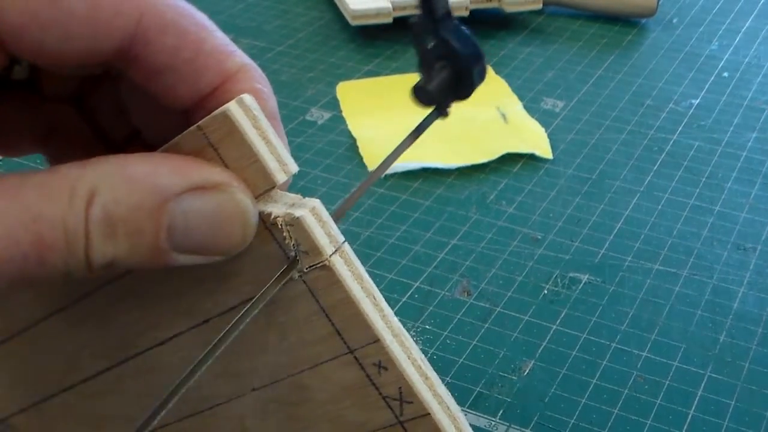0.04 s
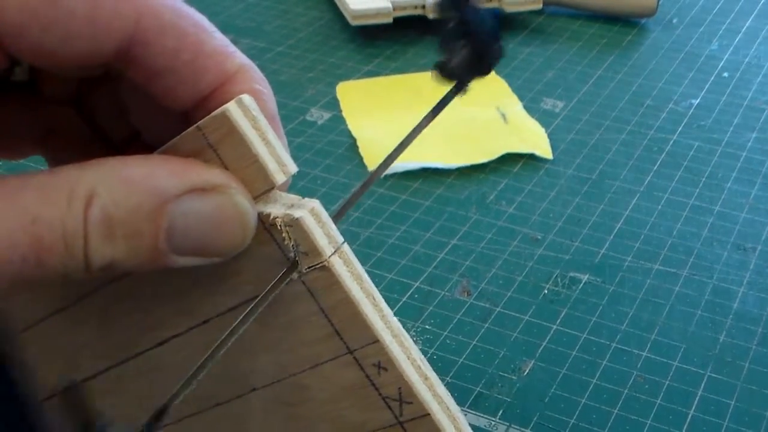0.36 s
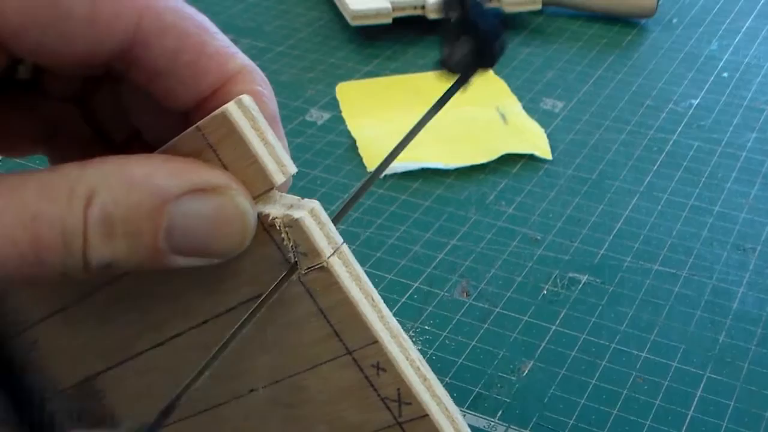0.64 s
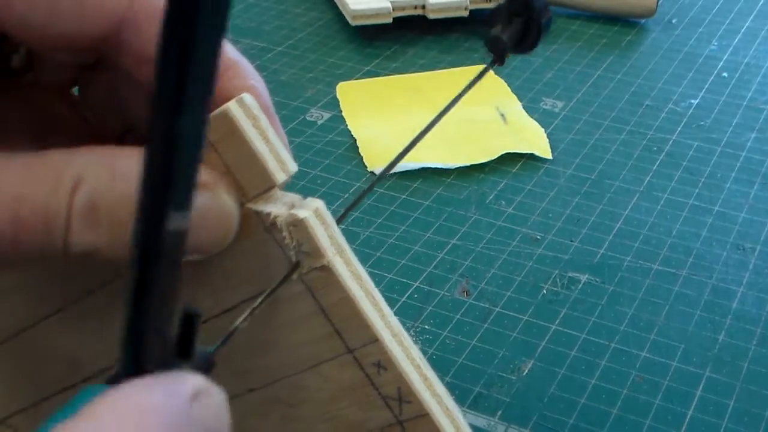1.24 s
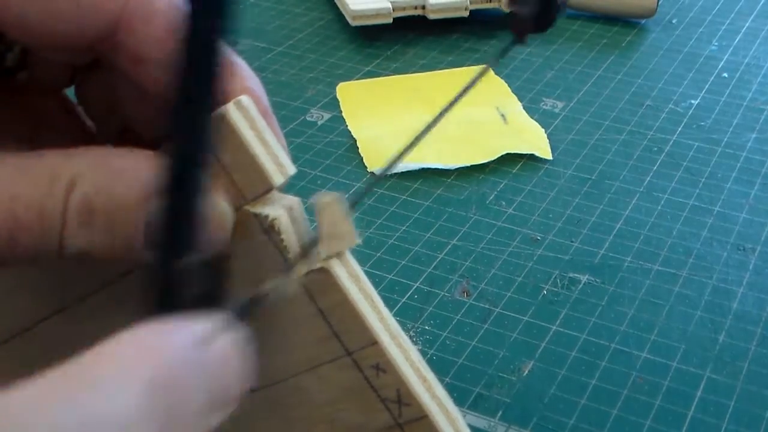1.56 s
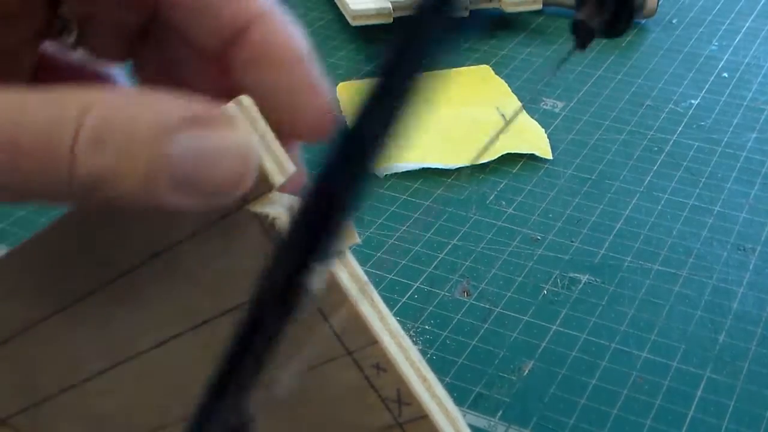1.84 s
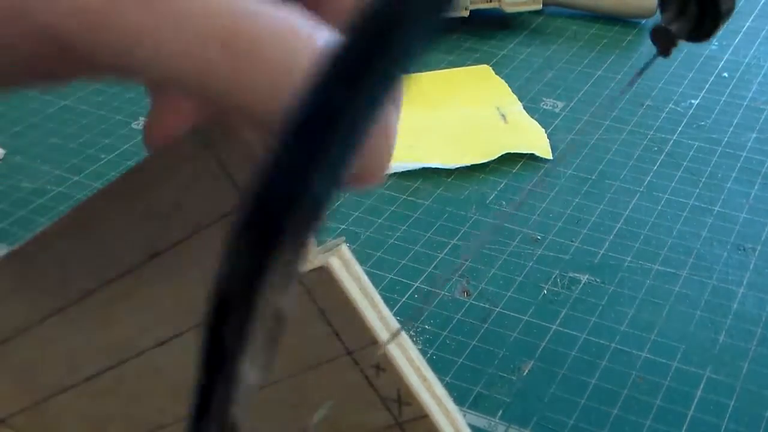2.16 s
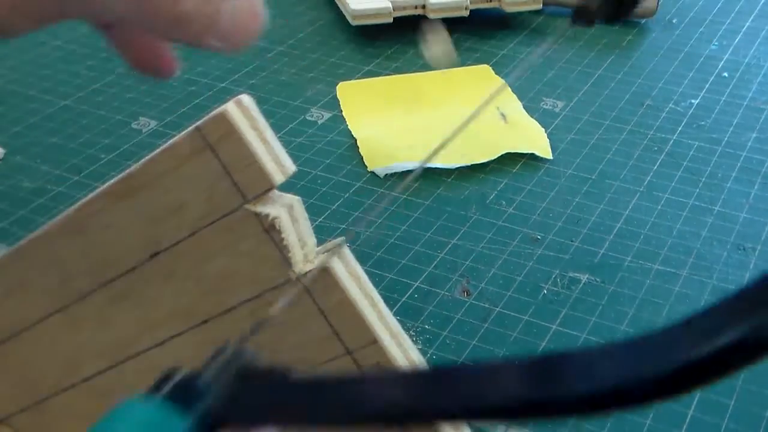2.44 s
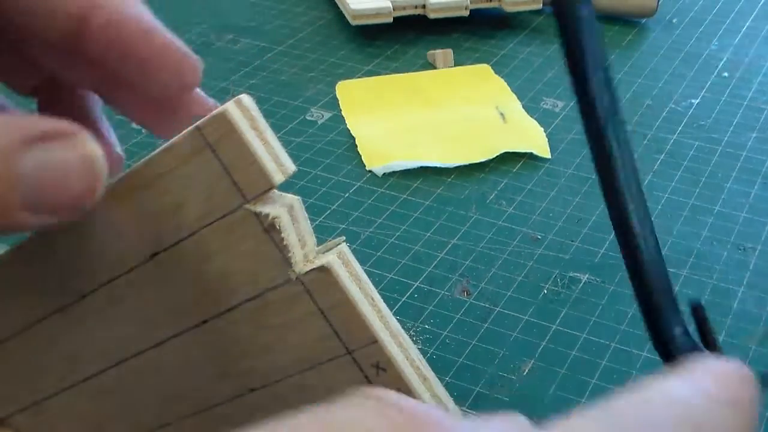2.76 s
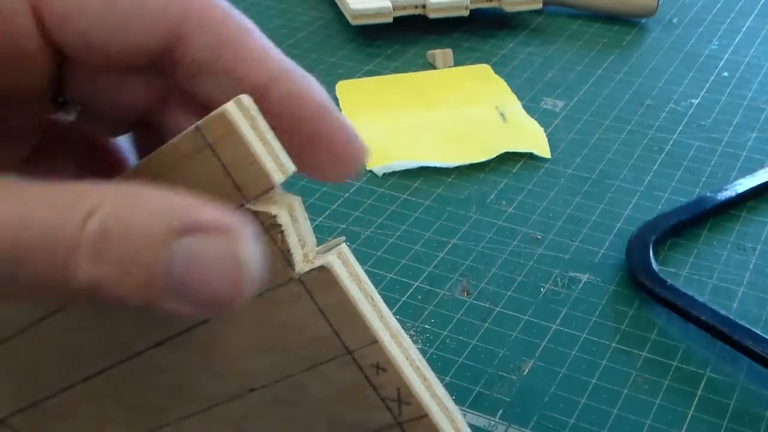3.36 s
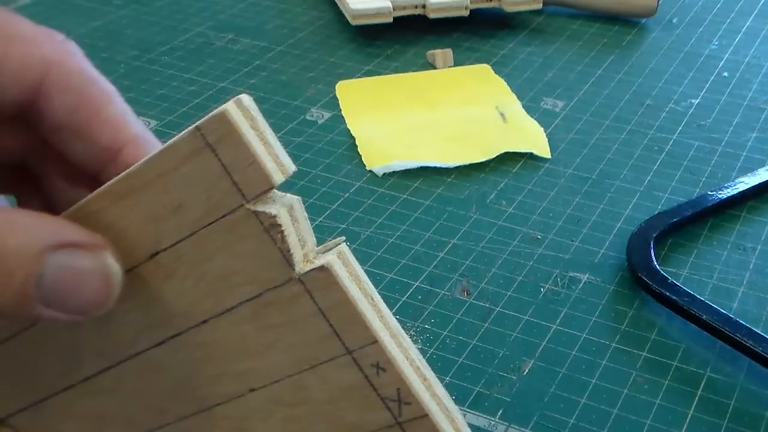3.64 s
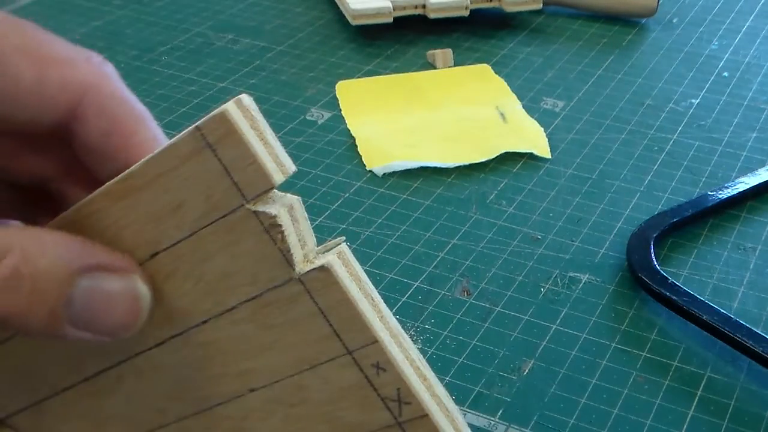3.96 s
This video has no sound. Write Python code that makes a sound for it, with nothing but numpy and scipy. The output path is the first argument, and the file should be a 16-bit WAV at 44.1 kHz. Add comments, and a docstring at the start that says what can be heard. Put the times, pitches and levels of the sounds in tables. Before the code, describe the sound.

A hand saw rasps quickly through plywood, followed by light clicks and wooden knocks.

```python
"""A coping saw cuts a notch in plywood held over a bench, heard close by in a small workshop.
Its teeth form an impulse train whose rate rises and falls with each stroke; with the tearing fibres
they force the resonances of board and frame. The blade snags, breaks through and is pulled free.
Impacts then excite damped modes: the offcut bounces, the board is knocked and slid with a rub of
friction, and the saw is set down."""
import sys
import numpy as np
from scipy import signal
from scipy.fft import rfft, irfft
from scipy.io import wavfile

SR = 44100
rng = np.random.default_rng(int(sys.argv[2]) if len(sys.argv) > 2 else 0)


def to_wav(s):
    """Save 16-bit WAV."""
    ch = np.atleast_2d(s).T  # columns
    pcm = np.round(np.clip(ch, -1, 1) * 32767)  # PCM
    wavfile.write(sys.argv[1], SR, pcm.astype(np.int16))


N = 176400

# Table levels are relative; T60 is the time to decay by 60 dB.
# saw strokes: t/s, length/s, attack/s, level/dB, peak tooth rate/Hz, tooth tone/dB, half-rate tone/dB,
# bass/dB, wood band/dB, treble/dB
STROKES = [(-.08, 0.1, .02, -5.5, 700, -6, -20, 12, 1, -1),
           (0.035, .130, 0.0028, 1, 1090, -5.5, -5.5, -7.5, -6, 0.5),
           (.194, .130, 0.014, -1, 1036, -3.5, -1, -8, -4.5, -1),
           (0.361, 0.11, 0.0023, -0.5, 870, 2, -8.5, -1.5, -3, 1.5),
           (0.497, 0.12, 0.026, -0.5, 860, 6.5, -10, -5, -5.5, -3),
           (0.657, 0.11, 0.0014, 0, 920, 1, -11, -5.5, -5, -1),
           (0.782, 0.097, 0.0065, 0.5, 950, -27, -11, -11, -7, -3.5),
           (.905, .112, .02, -2.5, 847.6, -1.5, -20, -5.5, -5, -2.5),
           (1.045, .125, 0.06, -10, 750, -20, -10.5, 1, -4, -0.5),
           (1.228, 0.064, 0.0071, 0.5, 300, -13, -21, 11.5, -3, 0.5),
           (1.325, 0.091, 0.018, -4.5, 780, 2.5, -12, 2.5, -1.5, 2.5),
           (1.477, .072, 0.0095, -2, 220.1, -4.5, -26, 6, -0.5, 1.5),
           (1.561, 0.093, 0.0044, 1.5, 560, -4.5, -34, -4, -2, 0)]
BODY_MODES = [(226, 62, -12), (495.6, 44, 2.5), (750, 160, 1), (883, 54, -0.5), (967, 20, -4.5),
              (1907, 145, -1.5), (2123, 61, -9.5), (2794, 240, -8), (3290, 240, -4), (3880, 126, -5),
              (4032, 81, -2.5), (4680, 234, -18), (7170, 170, -22.5), (8335, 270, -20.5)]  # board and saw under the teeth: f/Hz, nominal width/Hz, level/dB
RASP_SPECTRUM = [(100, -24.5), (350, -18.5), (1300, -20), (3000, -14.5), (5500, -25), (9000, -27.5),
                 (10800, -38), (12800, -30.5), (15000, -54)]  # broad response between those modes: f/Hz, level/dB
SLIDE_ENVELOPE = [(0, -40.5), (1.0, -41.5), (1.2, -50), (1.45, -48), (1.62, -43.5), (1.70, -37.5),
                  (1.76, -43), (1.83, -48), (1.91, -51.5), (2.04, -51), (2.12, -59.5), (2.3, -62.5)]  # loose blade in the cut: t/s, level/dB
SNAGS = [(.041, 6), (0.367, -0.5), (.659, 3), (.788, -1.5), (1.2156, -3), (1.2385, -0.5), (1.2485, -11),
         (1.267, 3), (1.277, -6), (1.4875, -5), (1.5655, -4.5), (1.685, 0.5), (1.776, 2), (1.7782, -2)]  # teeth catch in the kerf: t/s, level/dB
# hum of the frame after the last cut: t/s, level/dB
HUM_ENVELOPE = [(1.56, -63), (1.62, -29), (1.68, -49.5), (1.80, -43), (1.90, -53.5), (2.1, -90)]
FRAME_HITS = [(1.7684, -10, 3200), (1.7693, -10, 3240), (1.7719, -4, 3230), (3.8635, -2.5, 11600),
              (3.8658, -12.5, 3440), (3.8681, -11, 6000)]  # blows on the steel frame: t/s, level/dB, cutoff/Hz
FRAME_MODES = [(483, -19, 0.05), (803, -17, 0.057), (1280, -24, 0.045), (1550, -27, .12), (1855, -6, 0.033),
               (2214, -0.5, 0.028), (2590, -1.5, 0.0079), (2848, -32, .2), (3150, -4, 0.018),
               (4430, -9, 0.016), (5100, -2.5, 0.0087), (6020, -29.5, 0.2), (7800, -17, 0.028)]  # its distinct modes: f/Hz, level/dB, T60/s
FRAME_RING_SPECTRUM = [(400, -26), (1200, 12), (1700, 2), (3100, 4), (3900, -34), (5200, -52), (5750, 11),
                       (6400, -30), (7900, -23), (9000, -32), (15000, -15)]  # its dense after-ring: f/Hz, level/dB
FRAME_RADIATION = [(100, -25), (450, -8), (900, -9), (1500, 0.5), (8000, -0.5), (13000, -7)]  # its radiation efficiency: f/Hz, level/dB
RUSTLE_ENVELOPE = [(1.9, -59), (2.02, -55), (2.12, -54.5), (2.25, -53), (2.55, -59), (2.65, -61)]  # a hand lets go: t/s, level/dB
RUSTLE_SPECTRUM = [(40, -14), (120, 7), (400, -6.5), (1200, 2), (2800, -5.5), (5000, -19), (14000, -23)]  # skin on wood: f/Hz, level/dB
TOUCHES = [(1.9249, -2.5, 3900, 0.00077), (1.925, 0, 3880, 0.00051), (1.944, -14, 3120, 0.02),
           (1.9995, -11.5, 990, 0.0037), (2.167, -14, 3250, 0.015), (2.203, -15, 2860, 0.023),
           (2.249, -10.5, 2650, 0.015), (2.2535, -17, 6200, 0.0011), (2.431, -31.5, 7100, 0.0046),
           (3.196, -15, 4100, 0.011), (3.203, -24.5, 6800, 0.011), (3.212, -25, 3900, .005),
           (3.678, -10.5, 3800, 0.04)]  # scuffs of blade and fingers: t/s, level/dB, f/Hz, decay/s
BOUNCES = [(2.6159, -1), (2.6197, -6.5), (2.6268, -13), (2.7295, -3.5), (2.7403, -15)]  # the offcut hits the mat: t/s, level/dB
OFFCUT_MODES = [(760, -9.5, 0.029), (1630, -6.5, 0.024), (3500, 3.5, 0.0076), (6540, -11, 0.006),
                (6960, -14, 0.0029), (9000, -3, .003)]  # its modes: f/Hz, level/dB, T60/s
CRACK_SPECTRUM = [(200, -19), (600, 5.5), (3000, -1.5), (7000, -1), (10000, 0.5), (15000, -15)]  # its contact: f/Hz, level/dB
OFFCUT_REVERB_SPECTRUM = [(300, -8), (1500, -12), (3600, -1), (4800, 1), (7000, 1.5), (10000, -5),
                          (14000, -7)]  # its echo in the room: f/Hz, level/dB
DRAG_ENVELOPE = [(2.95, -91.5), (3.01, -51), (3.04, -42), (3.12, -59), (3.22, -48.5), (3.33, -57),
                 (3.39, -45.5), (3.46, -46), (3.56, -37.5), (3.64, -43.5), (3.75, -46.5), (3.85, -52.5),
                 (4, -59)]  # the board slides on the mat: t/s, level/dB
DRAG_SPECTRUM = [(30, -16), (60, -4.5), (257, 0.5), (700, -7), (1400, -10), (2200, -14), (3050, -20),
                 (3700, -18.5), (4700, -22.5), (7500, -28.5), (10000, -32), (15000, -44)]  # its friction: f/Hz, level/dB
KNOCKS = [(3.0158, -2, 2240, -1), (3.023, -16, 3000, 6), (3.0312, -22, 1500, -4), (3.256, 0.5, 5400, -3),
          (3.2665, -16, 3000, -2), (3.3099, -8.5, 3500, 0.5), (3.3496, -21, 3000, -15),
          (3.369, -8.5, 690, -15), (3.381, -12, 3500, 4), (3.3887, -6.5, 4000, -7), (3.399, -31, 9000, -2),
          (3.4583, -11, 3450, -1), (3.531, -8.5, 2880, -6.5), (3.5499, -13, 3500, 2.5)]  # the board hits the bench: t/s, level/dB, cutoff/Hz, ring/dB
CLACK_SPECTRUM = [(30, -36), (70, -14), (200, -11), (500, 1.5), (900, 4.5), (1400, 0), (2200, -6.5),
                  (3500, -7), (5500, -11), (7500, -12.5), (10000, -20.5), (15000, -24)]  # its contact: f/Hz, level/dB
BOARD_MODES = [(106, -9.5, 0.22), (168, -11.5, 0.11), (285, -17, 0.14), (355, 7, 0.058), (490, -7, 0.073),
               (683, 1, 0.041), (900, 1, 0.02), (1570, -6, 0.037), (3550, -12, 0.015)]  # its modes: f/Hz, level/dB, T60/s
# room tone: f/Hz, level/dB
AIR_SPECTRUM = [(15, 6.5), (25, 7.5), (38, -7.5), (52, -4), (76, -16.5), (240, -10.5), (350, -13.5),
                (650, -27.5), (1300, -22), (2800, -29), (4500, -31.5), (7100, -34.5), (14000, -39)]
ROOM_SPECTRUM = [(80, -17), (400, 3), (1500, 0), (4000, -7.5), (8000, -2.5), (15000, -7.5)]  # reverberation: f/Hz, level/dB
SIDE_SPECTRUM = [(30, -8), (120, -34), (500, -23.5), (2000, -16.5), (4000, -12), (8000, -2), (14000, -4.5)]  # stereo side against mid: f/Hz, level/dB

SAW_DB, TONE_DB, FIBRE_DB, EASE_DB = -25, -5, -1, 5
TURN_S, RELEASE_S, LOUDNESS_POWER = .012, 0.021, 0.27
TOOTH_JITTER, BLADE_SHIFT = .016, .008  # fractional spreads of frequency
TOOTH_SCATTER_DB, FIBRE_SCATTER_DB, TONE_WAVER_DB = 2, 2, .8
CHATTER_DB, CHATTER_HZ = 1.6, 170
SNAG_DB, FRAME_DB, FRAME_RING_DB, TOUCH_DB = -2.5, -16.5, -14, -7.5
OFFCUT_DB, CRACK_DB, CLACK_DB, BOARD_DB = -30, -7.5, 5, -27
AIR_DB, ROOM_DB, OFFCUT_REVERB_DB, ROOM_T60_S = -52, -16.5, -10, 0.57
AIR_SIDE_DB, ROOM_SIDE_DB, LEFT_DB = -3.5, -12.5, 0.2
HUM_HZ, TOP_HZ = 494, 14500


def undb(db):
    """Amplitude ratio of a level."""
    return 10 ** (np.asarray(db) / 20)


def unit(x):
    """Normalisation to unit RMS."""
    return x / np.sqrt(np.mean(x ** 2))


def times():
    """Sample times in seconds."""
    return np.arange(N) / SR


def wander(rate):
    """Random modulation of unit RMS, interpolated between `rate` values a second."""
    return unit(np.interp(times() * rate, np.arange(4096), rng.standard_normal(4096)))


def envelope(points):
    """Amplitude envelope from (t/s, level/dB) points."""
    return undb(np.interp(times(), *np.array(points).T))


def gains(points):
    """Magnitude response from (f/Hz, level/dB) points."""
    hz, db = np.array(points).T
    return undb(np.interp(np.log(np.fft.rfftfreq(8192, 1 / SR) + 1), np.log(hz), db))


def response(gain):
    """Minimum-phase impulse response of unit energy, by folding the cepstrum."""
    cepstrum = irfft(np.log(gain + 1e-9))
    half = len(cepstrum) // 2
    cepstrum[1:half] *= 2
    cepstrum[half + 1:] = 0
    h = irfft(np.exp(rfft(cepstrum)))[:half]
    return h / np.linalg.norm(h)


def resonance(hz, width):
    """Magnitude response of a damped oscillator."""
    f = np.fft.rfftfreq(8192, 1 / SR) + 1
    return 1 / np.hypot(1, (f * f - hz * hz) / (f * width))


def through(x, h):
    """Linear filtering by convolution."""
    return signal.fftconvolve(x, h)[:N]


def soften(x, hz):
    """A soft contact acts as a one-pole low-pass."""
    a = np.exp(-2 * np.pi * hz / SR)
    return signal.lfilter([1 - a], [1, -a], x)


def ring(modes):
    """Free vibration as a sum of damped sinusoids."""
    t = times()[:SR // 2]
    return sum(undb(db) * np.sin(2 * np.pi * hz * t) * undb(-60 * t / t60) for hz, db, t60 in modes)


def tail(spectrum, t60):
    """Overlapping modes merge into decaying noise, here of unit energy."""
    noise = through(rng.standard_normal(SR), response(gains(spectrum)))[:SR]
    h = noise * undb(-60 * times()[:SR] / t60)
    return h / np.linalg.norm(h)


def burst(decay_s):
    """A brief contact is broadband: partly whitened noise of unit energy."""
    spectrum = rfft(rng.standard_normal(4096) * np.exp(-times()[:4096] / decay_s))
    x = irfft(spectrum / abs(spectrum) ** .5)[:3072]
    return x / np.linalg.norm(x)


def place(events):
    """Superposition of (t/s, sound) pairs."""
    out = np.zeros(2 * N)
    for s, x in events:
        i = int(s * SR)
        out[i:i + len(x)] += x
    return out[:N]


def grains(scatter_db):
    """Shot noise from dense tiny fractures of uneven size."""
    impulses = rng.standard_normal(N) * (rng.random(N) < .2)
    return unit(impulses * undb(scatter_db * np.minimum(rng.exponential(size=N), 5)))


def body(shift):
    """The resonances of board and saw add in power; blade tension shifts the upper ones."""
    power = sum((undb(db) * resonance(hz * (1 + shift * (hz > 1500)), 1.63 * width) ** 2) ** 2
                for hz, width, db in BODY_MODES)
    return np.sqrt(power + gains(RASP_SPECTRUM) ** 2)


def saw_stroke(start, length, attack, db, top_hz, tone_db, half_db, bass_db, wood_db, treble_db):
    """Forced vibration: tooth impacts, at a rate set by blade speed, and torn fibres drive the body."""
    t = times() - start
    progress = np.clip((t + TURN_S) / (length + 2 * TURN_S), 0, 1)
    speed = np.abs(np.sin(np.pi * progress))
    contact = np.clip(t / attack, 0, 1) * np.clip((length - t) / RELEASE_S, 0, 1)
    push = undb(SAW_DB + db - EASE_DB * (progress - .5)) * speed ** LOUDNESS_POWER * contact
    tooth_hz = top_hz * speed
    cycles = np.cumsum(tooth_hz * (1 + TOOTH_JITTER * wander(500))) / SR
    teeth = np.diff(np.floor(cycles), prepend=0) * undb(TOOTH_SCATTER_DB * wander(1000))
    teeth *= 0.51 * np.sqrt(SR / (tooth_hz + 100))  # power nearly independent of rate
    fibres = undb(FIBRE_DB) * grains(FIBRE_SCATTER_DB) * (1 + 0.33 * np.cos(2 * np.pi * cycles))
    force = (teeth + fibres) * undb(CHATTER_DB * wander(CHATTER_HZ)) * push
    colour = gains([(220, bass_db), (450, wood_db), (1000, wood_db),
                    (1800, 0.0049), (4000, 0.045), (7000, treble_db)])
    rasp = through(force, response(body(BLADE_SHIFT * rng.standard_normal()) * colour))
    whine = undb(tone_db) * np.sin(2 * np.pi * cycles) + undb(half_db) * np.sin(np.pi * cycles)
    return rasp + undb(TONE_DB + TONE_WAVER_DB * wander(90)) * push * speed * whine


def blade_slide():
    """Sliding friction of the loose blade, weakly coupled to the body."""
    friction = envelope(SLIDE_ENVELOPE) * grains(2.9) * undb(2 * wander(90))
    return through(friction, response(body(0) ** 0.68))  # the exponent flattens the resonances


def room_tone():
    """Stationary background noise, strongest in the bass."""
    return undb(AIR_DB) * unit(through(rng.standard_normal(N), response(gains(AIR_SPECTRUM))))


def reverberation(sources, chip):
    """Diffuse reflections decay exponentially; those of the offcut are brighter."""
    room = undb(ROOM_DB) * through(sources, tail(ROOM_SPECTRUM, ROOM_T60_S))
    return room + undb(OFFCUT_REVERB_DB) * through(chip, tail(OFFCUT_REVERB_SPECTRUM, ROOM_T60_S))


def snags():
    """Impulsive excitation of the body as teeth catch."""
    jolts = place((s, undb(SNAG_DB + db) * burst(decay_s=0.0026)) for s, db in SNAGS)
    return through(jolts, response(body(0)))


def frame_hum():
    """One resonance of the frame lingers as narrow-band noise."""
    mode = response(resonance(HUM_HZ, width=60) ** 2)
    return envelope(HUM_ENVELOPE) * through(rng.standard_normal(N), mode)


def frame_clanks():
    """Free vibration of the struck steel frame, too thin to radiate bass."""
    after_ring = undb(FRAME_RING_DB) * tail(FRAME_RING_SPECTRUM, t60=0.77)[:SR // 2]
    vibration = undb(FRAME_DB) * ring(FRAME_MODES) + after_ring
    clank = through(vibration, response(gains(FRAME_RADIATION)))[:SR // 2]
    return place((s, undb(db) * soften(soften(clank, hz), hz)) for s, db, hz in FRAME_HITS)


def hand_rustle():
    """Friction noise of skin brushing wood."""
    friction = grains(2.1) * undb(3.6 * wander(40))
    return envelope(RUSTLE_ENVELOPE) * through(friction, response(gains(RUSTLE_SPECTRUM)))


def touches():
    """Light contacts of blade and fingers each excite one heavily damped resonance."""
    return place((s, undb(TOUCH_DB + db) * through(burst(decay), response(resonance(hz, width=650))))
                 for s, db, hz, decay in TOUCHES)


def offcut_bounces():
    """Each impact of the chip gives a dry contact transient and excites its modes."""
    contact = response(gains(CRACK_SPECTRUM))
    rings = place((s, undb(OFFCUT_DB + db) * ring(OFFCUT_MODES)) for s, db in BOUNCES)
    cracks = place((s, undb(CRACK_DB + db) * through(burst(0.0011), contact)) for s, db in BOUNCES)
    return rings + cracks


def board_drag():
    """Sliding friction of the board on the mat gives a low, uneven rub."""
    friction = grains(2.5) * undb(1.2 * wander(70))
    return envelope(DRAG_ENVELOPE) * through(friction, response(gains(DRAG_SPECTRUM)))


def board_knocks():
    """Impacts clack and excite the low plate modes; softer contacts carry less treble."""
    clack = undb(CLACK_DB) * response(gains(CLACK_SPECTRUM))
    modes = undb(BOARD_DB) * ring(BOARD_MODES)
    clacks = place((s, undb(db) * soften(clack, hz)) for s, db, hz, _ in KNOCKS)
    rings = place((s, undb(db + ring_db) * soften(modes, hz)) for s, db, hz, ring_db in KNOCKS)
    return clacks + rings


def scene():
    """Direct and diffuse sound add; scattering from the bench widens the treble."""
    chip = offcut_bounces()
    saw = blade_slide() + snags() + frame_hum() + sum(saw_stroke(*row) for row in STROKES)
    handling = frame_clanks() + touches() + board_drag() + board_knocks() + hand_rustle()
    mid = saw + handling + chip + room_tone() + reverberation(saw + handling, chip)
    width = gains(SIDE_SPECTRUM)
    scattered = through(saw, burst(0.009)) + through(handling + chip, burst(0.0051))
    side = through(scattered, response(width)) * np.sqrt(np.mean(width ** 2))
    side += undb(AIR_SIDE_DB) * room_tone()
    side += undb(ROOM_SIDE_DB) * reverberation(saw + handling, chip)
    return np.array([(mid + side) * undb(LEFT_DB / 2), (mid - side) * undb(-LEFT_DB / 2)])


def record(dry):
    """Band limiting removes the deepest bass and the highest treble."""
    dry = signal.sosfilt(signal.butter(2, 20, "highpass", fs=SR, output="sos"), dry)
    return signal.sosfilt(signal.ellip(8, .2, 70, TOP_HZ, fs=SR, output="sos"), dry)


dry = scene()
out = record(dry)
to_wav(out)
```